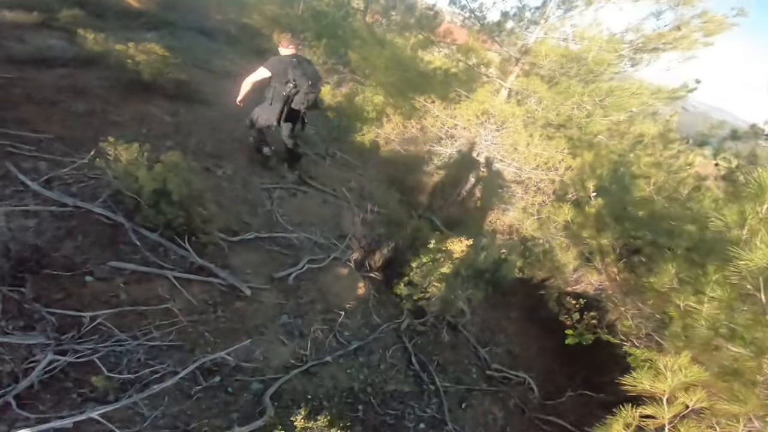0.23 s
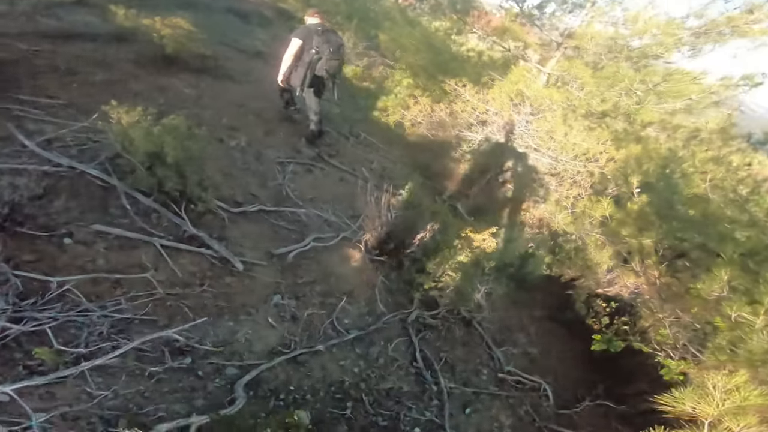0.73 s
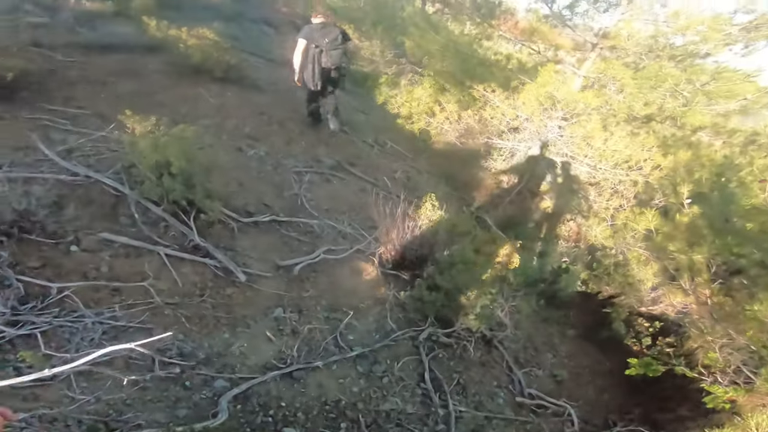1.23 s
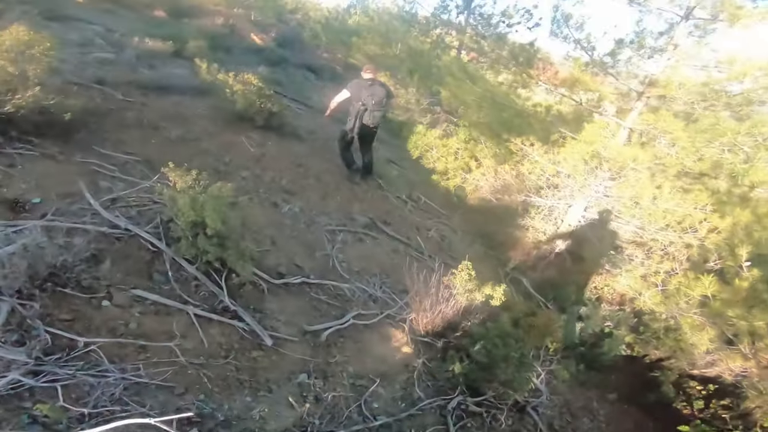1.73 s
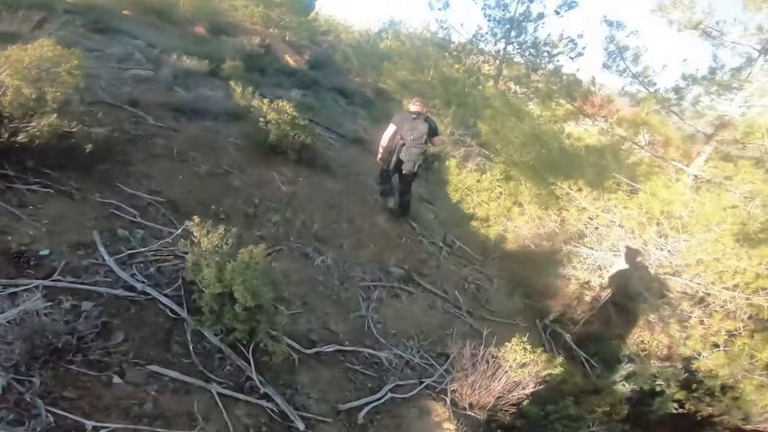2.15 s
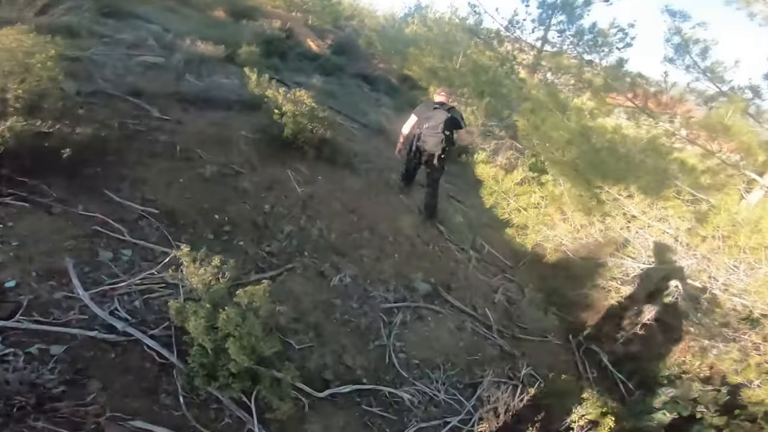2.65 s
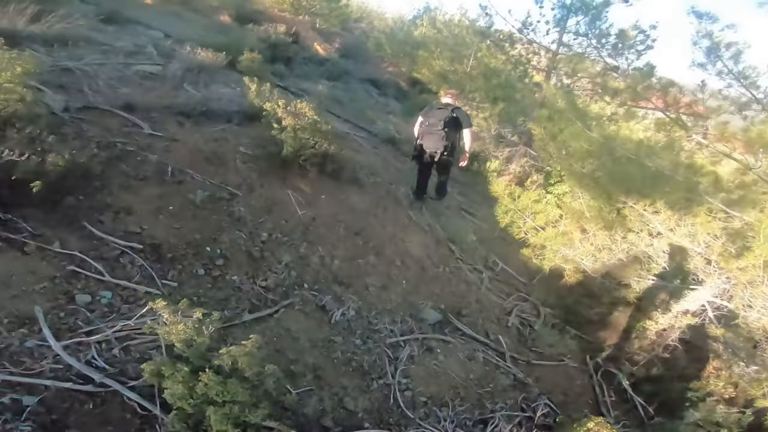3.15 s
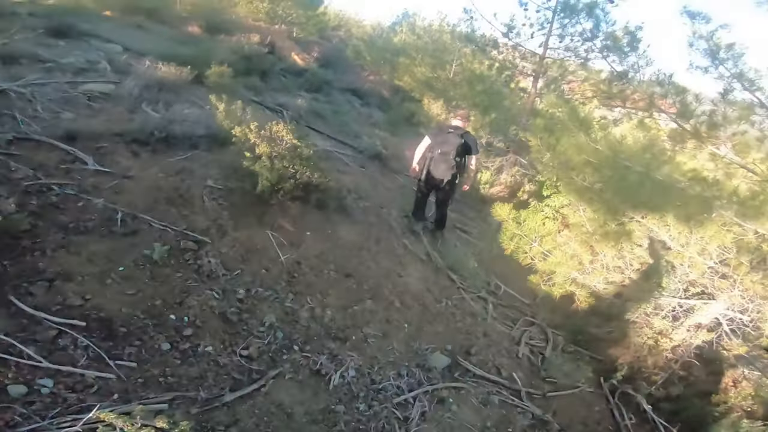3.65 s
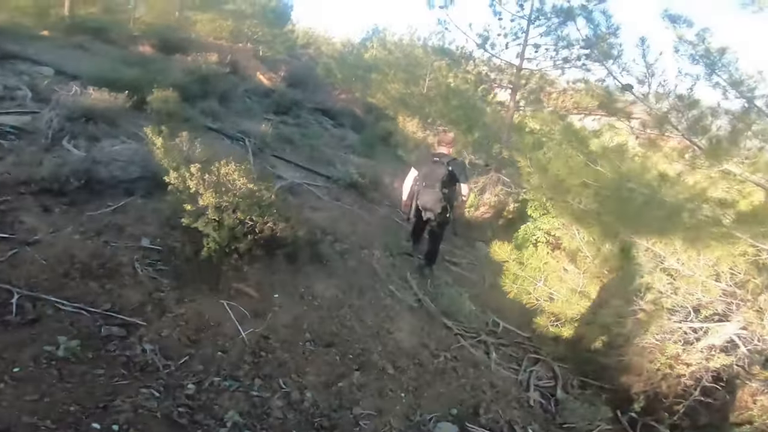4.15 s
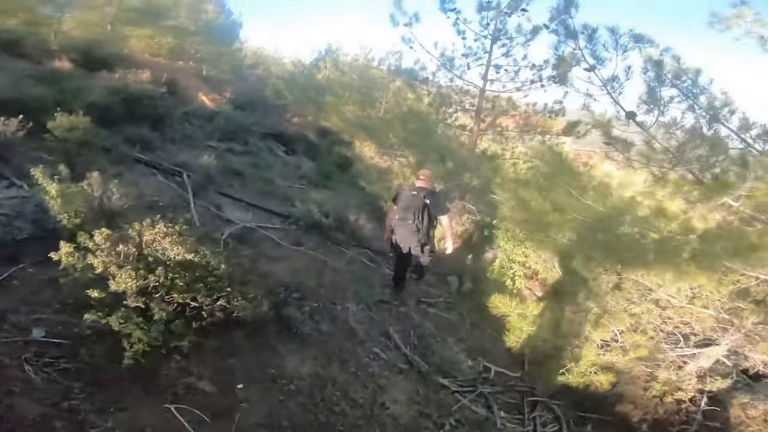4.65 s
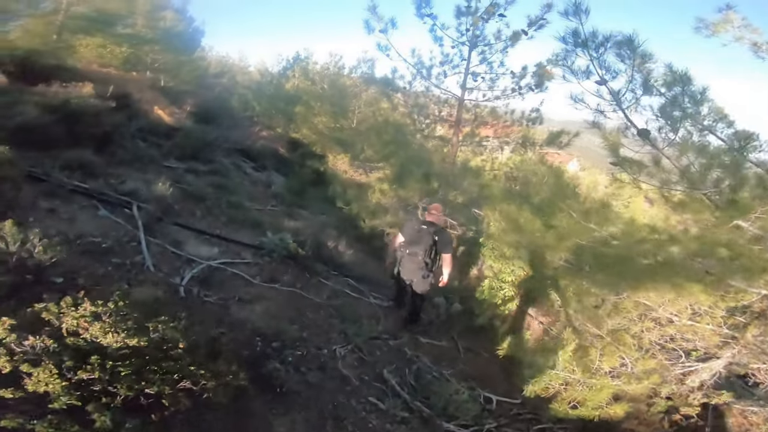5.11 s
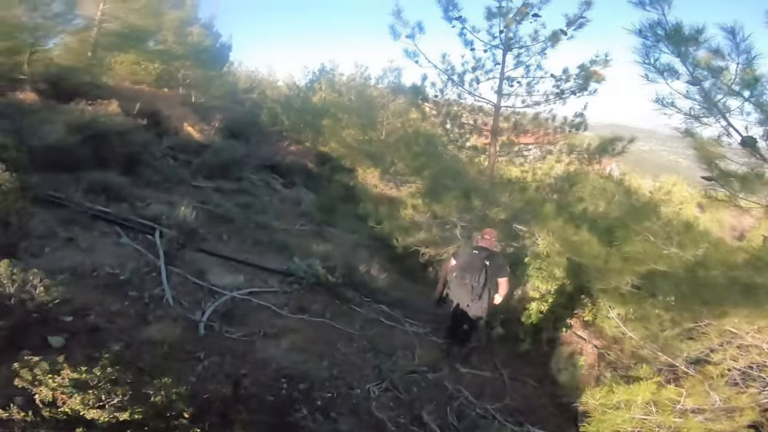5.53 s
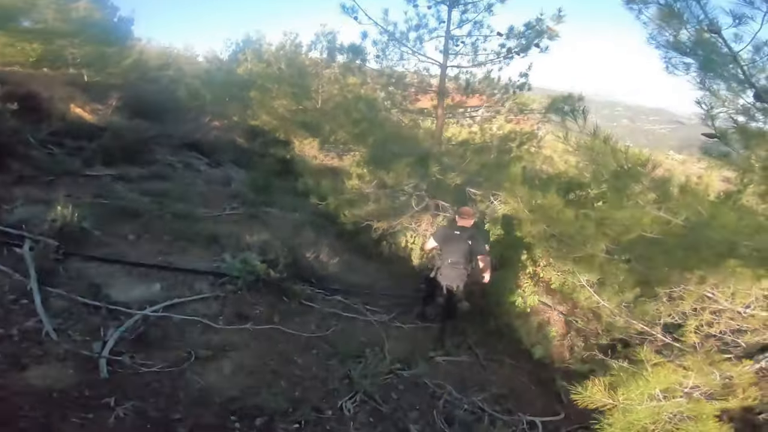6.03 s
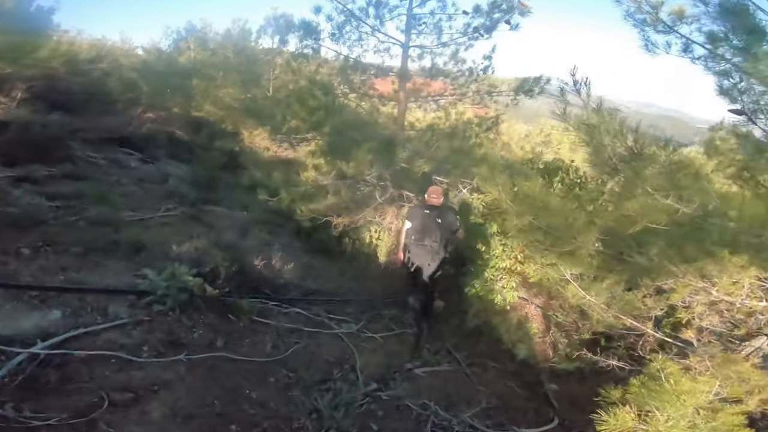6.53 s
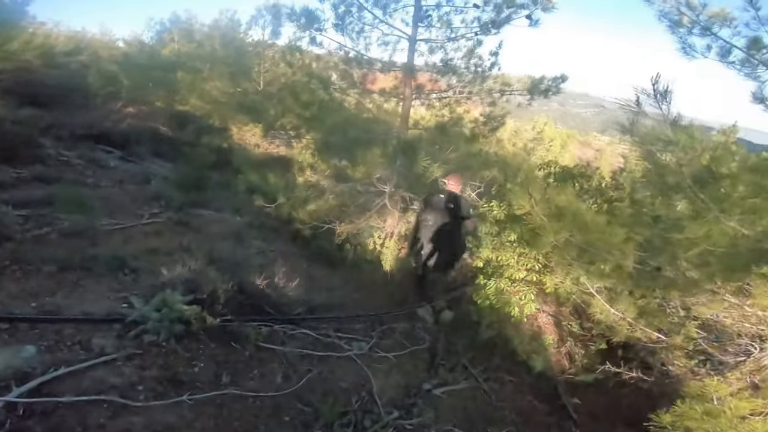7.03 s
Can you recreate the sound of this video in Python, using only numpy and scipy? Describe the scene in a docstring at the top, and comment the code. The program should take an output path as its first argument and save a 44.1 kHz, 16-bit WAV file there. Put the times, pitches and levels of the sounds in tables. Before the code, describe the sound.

Dry twigs crack under uneven footsteps as hikers push through rustling scrub, a light wind in the pines.

```python
"""Scrub rustles and scrapes along clothing, mostly on the right, as hikers cross a slope of pine litter.
Wind hushes in the pines and now and then buffets a body-worn microphone. Boots grind and thud,
dead twigs snap, loose sticks knock, and a branch rasps once. Friction is modelled as many tiny
random impacts over noise, each blow or fracture as a damped vibration, and the wind as shaped noise."""
import sys
import numpy as np
from scipy import signal
from scipy.fft import rfft, irfft, next_fast_len
from scipy.io import wavfile
from scipy.ndimage import uniform_filter1d, map_coordinates

SR = 44100
rng = np.random.default_rng(int(sys.argv[2]) if len(sys.argv) > 2 else 0)


def digitize_waveform(pressure):
    """Quantize a signal to 16-bit integers and store it at the path in sys.argv[1].

    Rows of a 2-D input are taken as channels; values are limited to [-1, 1].
    """
    field = np.atleast_2d(pressure).T
    bounded = np.clip(field, -1, 1)
    quanta = np.round(bounded * 32767).astype(np.int16)
    wavfile.write(sys.argv[1], SR, quanta)


N = 320607


def amp(db):
    """Amplitude ratio of a level in decibels."""
    return 10 ** (np.asarray(db) / 20)


def unit(x):
    """Normalisation to an rms of 1."""
    return x / np.sqrt(np.mean(x ** 2) + 1e-20)


def along(points, hz):
    """Interpolation of (frequency, value) points on a logarithmic frequency axis."""
    freqs, values = np.transpose(points)
    return np.interp(np.log(hz + 1), np.log(freqs + 1), values)


def curve(points):
    """Linear interpolation of (time, value) points at every sample."""
    return np.interp(np.arange(N) / SR, *np.transpose(points))


def wobble(rate):
    """Smooth random modulation: a spline through `rate` Gaussian values a second."""
    knots = rng.standard_normal(int(N * rate / SR) + 4)
    return map_coordinates(knots, [np.arange(N) * rate / SR])


def filtered(x, response):
    """Linear filtering: the spectrum is multiplied by a frequency response."""
    n = x.shape[-1]
    padded = next_fast_len(2 * n)
    return irfft(rfft(x, padded) * response(np.fft.rfftfreq(padded, 1 / SR)), padded)[..., :n]


def resonance(f, hz, q):
    """Response of a damped oscillator of natural frequency hz and quality factor q."""
    return 1j * f * hz / q / (hz * hz - f * f + 1j * f * hz / q)


def pan(side_db):
    """Constant-power panning by a level difference, left minus right."""
    gains = np.array([amp(side_db / 2), amp(-side_db / 2)]).reshape(2, -1)
    return gains / np.sqrt(np.mean(gains ** 2, axis=0))


# Likeness of left and right: (frequency [Hz], correlation [0-1])
COHERENCE = [(40, 0.38), (170, 0.92), (380, 0.91), (750, 0.65), (1300, 0.11), (2400, 0.63), (4400, 0.7),
             (8000, 0), (15000, 0.031)]

def stereo(pair, spectrum=((1, 0),)):
    """Partial coherence: two independent signals, shaped by a spectrum, mix as mid and side."""
    def response(hz):
        angle = np.arccos(np.clip(along(COHERENCE, hz), -1, 1)) / 2
        return amp(along(spectrum, hz)) * [np.cos(angle), np.sin(angle)]
    mid, side = filtered(pair, response)
    return unit(np.array([mid + side, mid - side]))


def add(track, s, sound):
    """Superposition of a short sound on a track at time s."""
    start = max(round(s * SR), 0)
    part = track[:, start:start + sound.shape[1]]
    part += sound[:, :part.shape[1]]


def crackle(rate, hz, cycles, spread_db, smooth_db):
    """Shot noise: tiny fractures ring, falling to 1/e in `cycles` periods, over smooth rubbing noise."""
    draws = rng.random((int(rate * N / SR), 6))
    t = np.arange(SR // 250) / SR
    pitch = hz * 2 ** (1.42 * (draws[:, 1] + draws[:, 2] - 1))[:, None]
    size = amp(-spread_db * np.log(0.15 + draws[:, 3]))[:, None]
    rings = size * np.sin(2 * np.pi * pitch * t) * np.exp(-pitch * t / cycles)
    samples = ((draws[:, :1] * N).astype(int) + np.arange(len(t))).ravel()
    signs = np.sign(draws[:, 4:].T - .5)
    pair = np.array([np.bincount(samples, (rings * sign[:, None]).ravel(), N)[:N] for sign in signs])
    return unit(pair) + amp(smooth_db) * rng.standard_normal((2, N))


def patchy(pair, depth_db):
    """Spectral modulation: brief resonances come and go as different stalks and stones are touched."""
    spectra = signal.stft(pair, nperseg=512)[2]
    field = rng.standard_normal(spectra.shape[1:])
    for axis in (0, 1):
        field = uniform_filter1d(field, size=4, axis=axis)
    return unit(signal.istft(spectra * amp(depth_db * unit(field)), nperseg=512)[1][:, :N])


def stroke(s, length, attack_s, release_s, arch_db):
    """Contact envelope: exponential rise and decay (seconds per 20 dB) around an arched or dipped hold."""
    t = np.arange(N) / SR - s
    middle = np.sin(np.pi * np.clip(t / length, 0, 1))
    rise_db = -20 * np.maximum(-t / attack_s, 0)
    decay_db = -20 * np.maximum((t - length) / release_s, 0)
    return amp(arch_db * middle + rise_db + decay_db)


def contacts(rows, **envelope):
    """Incoherent addition: contacts sum in power, giving gains for the main sound and its bright part."""
    gains = np.array([amp(db) * stroke(s, length, **envelope) for s, length, db, _ in rows])
    bright = amp([row[3] for row in rows])[:, None]
    return np.linalg.norm(gains, axis=0), np.linalg.norm(gains * bright, axis=0)


def stalks(per_s=45, decay_s=.002, spread_db=6):
    """A Poisson process: tiny dry stalks break at random, each in a decaying burst of coloured noise."""
    breaks = (rng.random(N) < per_s / SR) * amp(spread_db * rng.uniform(-0.93, 1, N))
    bursts = signal.lfilter([1], [1, -np.exp(-1 / (decay_s * SR))], breaks)
    return unit(bursts * patchy(rng.standard_normal((2, N)), depth_db=5))


# Sprigs dragged over clothing: (time [s], duration [s], level [dB], fabric relative to needles [dB])
BRUSHES = [(.04, 0.059, -49, -8.5), (.19, .12, -48.5, -13), (.645, 0.25, -48, -6.5),
           (1.14, 0.16, -47, -7.5), (1.29, 0.17, -50, -3), (1.59, 0.27, -47, -8.5), (1.9, 0.25, -50, -6.5),
           (2.195, 0.022, -43.5, -5.5), (2.29, 0.2, -50, -8), (2.5, 0.046, -41.5, -10),
           (3.238, 0.08, -39.5, -7), (3.33, 0.24, -46.5, -8), (4.24, 0.092, -46, -5),
           (4.36, 0.25, -46.5, -8), (4.585, 0.13, -42.5, -1), (4.915, 0.088, -42.5, -8),
           (5.02, 0.067, -44, -12), (5.235, 0.0053, -40, -9), (5.6, 0.13, -52, -4), (5.77, 0.16, -51.5, -2),
           (5.95, 0.063, -32, -13.5), (6.04, 0.15, -50.5, -5.5), (6.335, 0.23, -53.5, 3),
           (6.595, 0.19, -44, 0), (6.82, 0.16, -47, -4.5), (7.05, 0.16, -46.5, -2.5)]
# Steady rustle of walking, hushed where the walker slows: (time [s], level [dB])
RUSTLE = [(0, -54.5), (1.0, -54.5), (1.5, -52), (2.6, -53.5), (3.07, -56.5), (3.2, -66), (3.6, -54.5),
          (4.0, -57.5), (4.8, -52), (5.2, -53), (5.8, -50.5), (6.25, -54.5), (7.27, -49)]
# Direction of the needles and the grit: (time [s], left minus right [dB])
CONTACT_SIDE = [(0, 3), (.8, -8), (1.3, 1), (2.2, -4.5), (2.5, -8.5), (2.9, -4.5), (3.3, -7.5), (3.8, -5.5),
                (4.4, -10), (4.7, -11), (5, -5), (6.7, -12.5)]
# Friction spectra of needles and of fabric: (frequency [Hz], level [dB])
NEEDLE_SPECTRUM = [(200, -40), (900, -2), (1600, -0.5), (2400, -2.5), (3300, -1), (4400, -3.5),
                   (5400, -2.5), (7000, -18.5), (10000, -23), (16000, -47)]
FABRIC_SPECTRUM = [(1500, -53), (4500, -27.5), (6500, -0.5), (7700, 0.5), (8700, -1.5), (9700, -8),
                   (11000, -20), (15000, -25.5)]

def scrub(stirred_db=-11, rustle_sheen_db=-6, stalks_db=-8):
    """Stick-slip friction: needles catch and let go in ticks, stalks break, and tips hiss over fabric."""
    brush, sheen = contacts(BRUSHES, attack_s=0.017, release_s=0.048, arch_db=-1)
    _, grind = contacts(STEPS, **STEP_ENVELOPE)  # the soles stir needles too
    rustle = amp(curve(RUSTLE))
    brush = np.linalg.norm([brush, rustle, amp(stirred_db) * grind], axis=0)
    sheen = np.hypot(sheen, amp(rustle_sheen_db) * rustle)
    side_db = curve(CONTACT_SIDE)
    drag = amp(1.1 * wobble(120))
    ticks = patchy(crackle(rate=650, hz=4800, cycles=.8, spread_db=3.8, smooth_db=4.5), depth_db=2)
    crunch = ticks + amp(stalks_db) * stalks()
    needles = amp(-1.5) * brush * stereo(crunch, NEEDLE_SPECTRUM) * pan(side_db)
    fabric = amp(-2.0) * sheen * stereo(crunch, FABRIC_SPECTRUM) * pan(0.35 * side_db)
    return drag * (needles + fabric)


# Puffs of air over the microphone: (time [s], level [dB], half width at 1/e [s])
PUFFS = [(.12, -44, 0.036), (.77, -44, 0.092), (2.0, -52, 0.099), (2.66, -52, 0.094), (4.17, -41.5, 0.04),
         (4.76, -52, 0.087), (5.35, -42.5, 0.034), (5.86, -44.5, 0.16), (6.39, -39.5, 0.095),
         (6.83, -53, 0.14)]
# Spectra of wind in the pines and at the microphone: (frequency [Hz], level [dB])
HUSH_SPECTRUM = [(25, -19), (90, -45), (170, 1), (1300, 5), (3200, 5.5), (8000, -20), (11000, -41),
                 (15000, -39)]
RUMBLE_SPECTRUM = [(12, -20), (28, 3.5), (40, -7), (60, -15), (110, -33), (300, -64), (900, -110)]

def wind():
    """Turbulence: a broadband hush in the pines, and low pressure fluctuations at the microphone."""
    t = np.arange(N) / SR
    puffs = sum(amp(db) * np.exp(-((t - s) / width) ** 2) for s, db, width in PUFFS)
    hush = amp(-60.5 + 0.23 * wobble(2.4)) * stereo(rng.standard_normal((2, N)), HUSH_SPECTRUM)
    rumble = amp(0.5) * puffs * stereo(rng.standard_normal((2, N)), RUMBLE_SPECTRUM)
    return hush * pan(-1.0) + rumble * pan(-8.5)


# Soles pressing on the slope: (time [s], duration [s], level [dB], grit relative to scuff [dB])
STEPS = [(.06, 0.081, -42.5, -2.5), (.21, 0.093, -47, 1), (.68, 0.1, -45.5, 2), (.9, 0.05, -48, -5.5),
         (1.12, 0.17, -57, 5), (1.43, .025, -42.5, -7), (1.575, 0.11, -46.5, -1), (1.845, 0.048, -47.5, 2),
         (1.98, 0.11, -56, 5), (2.28, 0.095, -50, 2), (2.47, 0.19, -54, 2), (2.7, 0.11, -58, 1),
         (3.025, .02, -52, 3), (3.132, 0.0099, -52.5, 5.5), (3.24, 0.015, -53.5, 3), (3.41, 0.17, -52.5, 2),
         (4.115, 0.093, -52, 5.5), (4.24, 0.038, -46, 7.5), (4.355, 0.028, -50.5, 3.5),
         (4.51, 0.11, -49.5, -1), (4.672, 0.057, -43, 4.5), (4.95, 0.11, -49, 0), (5.3, 0.089, -51, 2),
         (5.56, 0.28, -47.5, 1.5), (5.94, 0.062, -45, -2), (6.07, 0.45, -57.5, -2), (6.34, 0.034, -45, 3),
         (6.455, 0.02, -43.5, 2.5), (6.62, 0.26, -53.5, 2.5), (7.03, 0.04, -61.5, 12)]
STEP_ENVELOPE = dict(attack_s=0.092, release_s=0.1, arch_db=-1.5)  # the load eases between heel and toe
# Friction spectra of dull soil and of grit: (frequency [Hz], level [dB])
SCUFF_SPECTRUM = [(30, -8.5), (95, -23.5), (150, 0), (230, 0), (400, 0), (600, -0.5), (1200, -14.5),
                  (3000, -90)]
GRIT_SPECTRUM = [(100, -53), (350, -13), (600, -4), (950, -2), (1400, -1.5), (2400, -3.5), (6000, -20),
                 (16000, -80)]

def soles(trickle_scuff_db=-62.5, trickle_grit_db=-61):
    """Granular friction: soles scuff soil and grind grit in uneven slips; soil trickles between steps."""
    press, grind = contacts(STEPS, **STEP_ENVELOPE)
    press = np.hypot(press, amp(trickle_scuff_db))
    grind = np.hypot(grind, amp(trickle_grit_db))
    slips = wobble(90)
    soil = crackle(rate=900, hz=353, cycles=0.47, spread_db=5.5, smooth_db=7.5)
    grains = crackle(rate=600, hz=900, cycles=1.2, spread_db=3.8, smooth_db=0)
    scuff = stereo(soil, SCUFF_SPECTRUM) * press * amp(1.83 * slips)
    grit = stereo(grains, GRIT_SPECTRUM) * grind * amp(2.0 * slips)
    return scuff * pan(-0.33) + grit * pan(curve(CONTACT_SIDE))


# Boots landing: (time [s], level [dB], frequency [Hz])
HEELS = [(.089, -29, 400), (.101, -30, 180), (0.126, -30.5, 160), (.698, -34, 620), (.891, -43, 640),
         (1.445, -34, 680), (1.502, -37, 420), (1.855, -38, 870), (2.273, -40, 330), (2.287, -36, 750),
         (2.363, -40, 750), (2.398, -36.5, 880), (2.906, -42, 400), (3.622, -42, 500), (2.821, -38.5, 216),
         (2.999, -38.5, 695), (3.007, -35.5, 266), (3.541, -32.5, 303), (4.899, -42, 248), (5.06, -33, 282),
         (5.32, -39.5, 1050), (5.984, -32, 327)]

def heels(grit_db=-4, grit_t60=0.07, low_cut_hz=129, gain_db=1):
    """Heavily damped impact: packed soil gives for a few cycles under a boot, with a gritty slap."""
    out, t = np.zeros((2, N)), np.arange(SR // 10) / SR
    for s, db, hz in HEELS:
        soil = 1.15 * np.sin(2 * np.pi * hz * t) * np.exp(-hz * t)
        noise = rng.standard_normal(len(t))
        grit = unit(filtered(noise, lambda f: resonance(f, hz, 2.05) * resonance(f, hz, 0.34)))
        slap = grit * amp(grit_db - 60 * t / grit_t60) * (1 - np.exp(-t / 0.00015))
        # a low cut keeps deep bass out of the thud
        thud = filtered(soil + slap, lambda f: 1j * f / low_cut_hz * resonance(f, low_cut_hz, 0.99))
        add(out, s, amp(db + gain_db) * pan(-1.4) * thud)
    return out


# Twigs breaking, and a few hollow knocks of grit under the boots: (time [s], level [dB], frequency [Hz], 60 dB
# decay time [s], left minus right [dB])
TWIGS = [ (0.3529, -30.5, 1000, 0.005, -7), (0.3754, -33, 1400, 0.011, -5), (0.429, -39, 3100, .02, 0),
         (0.9985, -31, 2350, 0.005, -10), (0.554, -37.5, 720, 0.011, 7), (0.7905, -32.5, 2400, 0.01, 0),
         (0.839, -35.5, 4100, 0.027, -12), (0.952, -37, 750, 0.0079, 6), (1.2795, -35, 3200, .014, 1),
         (1.383, -37, 3200, .012, 0), (1.4287, -33.5, 1900, 0.02, -1), (1.7343, -32, 3280, 0.016, -1),
         (1.744, -33, 3300, .014, -1), (2.062, -34, 3600, .012, 1), (2.0667, -30, 3260, 0.018, 2),
         (2.161, -37.5, 4270, 0.014, 7), (2.4755, -30.5, 850, 0.016, -4), (2.5157, -32.5, 2090, 0.022, -11),
         (2.5596, -10, 7600, 0.01, -13), (2.5602, -20.5, 5200, .008, -14), (2.561, -29, 1000, .012, -10),
         (2.532, -27, 7200, 0.022, -18), (2.64, -31, 990, 0.012, -12), (2.711, -39, 4550, 0.022, -8),
         (2.82, -40, 3750, 0.022, -8), (3.2275, -28.5, 2300, .03, -12), (3.2475, -23.5, 2400, .03, -14),
         (3.2646, -26.5, 2100, .028, -13), (3.281, -30.5, 1900, .03, -13), (3.3055, -32, 4190, .022, -10),
         (3.374, -31.5, 1970, 0.014, -12), (3.868, -38.5, 800, 0.018, 3), (3.9448, -39.5, 1100, 0.01, -8),
         (4.384, -32, 4400, 0.02, -4), (4.452, -34, 4200, 0.032, -2), (4.5145, -29.5, 2520, 0.02, -2),
         (4.5388, -29.5, 3000, 0.012, -1), (4.672, -26, 3400, 0.02, -12), (4.679, -27, 750, .009, -8),
         (4.721, -29.5, 1100, .008, -8), (4.7699, -22, 880, 0.002, -12), (4.9249, -33.5, 4800, 0.02, -2),
         (5.3578, -33.5, 4020, 0.013, -3), (5.4788, -34.5, 1770, 0.016, 1), (5.6043, -25.5, 3800, 0.02, -4),
         (5.835, -34, 4200, 0.021, -2), (5.921, -33, 3300, 0.04, -4.5), (5.953, -19, 3600, .026, -4),
         (5.9838, -26, 2800, .02, -3), (5.9935, -22.5, 4600, .025, -5), (6.0137, -23.5, 3830, .012, -4),
         (6.024, -30, 3000, .024, -4), (6.054, -35, 3800, 0.022, 0), (6.603, -34.5, 4070, 0.03, -3),
         (6.7071, -31, 5500, 0.016, -6), (6.767, -32, 3400, .016, -9), (6.791, -28, 3080, 0.017, -11),
         (6.9035, -35.5, 5200, .012, -8), (6.9271, -31, 6330, 0.0065, -8), (6.9789, -29, 3080, 0.009, -6),
         (7.2108, -34, 3800, 0.009, -6)]
# Response of the microphone to sharp sounds: (frequency [Hz], gain [dB])
CRACK_RESPONSE = [(60, -20), (160, 5.5), (7800, 4), (9500, -2.5), (11000, -10.5), (16000, -30)]

def twigs(q=2, body_db=-15, splinter_db=-3, stub_db=-20, litter_db=-24, litter_t60=0.12):
    """Fracture: a brittle twig cracks once; a tough one splinters, its stub rings and litter stirs."""
    out, t = np.zeros((2, N)), np.arange(SR // 10) / SR
    impulse = signal.unit_impulse(len(t), 20)
    for s, db, hz, t60, side_db in TWIGS:
        toughness = t60 / 0.024
        # the bend builds over a cycle or two; thick, low-pitched twigs give little treble
        bend = filtered(impulse, lambda f: resonance(f, hz, q) * resonance(f, hz, 0.88))
        body = filtered(impulse, lambda f: resonance(f, hz, 1.0) / (1 + 1j * f / hz))
        crack = bend + amp(body_db) * body
        crack /= np.sqrt(np.sum(crack ** 2) / (SR * 0.00064))  # the energy of 0.64 ms at rms 1
        noise = stereo(rng.standard_normal((2, len(t))))
        fibres = unit(filtered(noise, lambda f: resonance(f, hz, 0.82)))
        fibres *= amp(splinter_db - 60 * t / t60) + amp(litter_db - 60 * t / litter_t60)
        stub = np.sin(2 * np.pi * hz * t) * amp(stub_db - 60 * t / t60) * toughness ** 3
        fibre_share = min(toughness, 1)
        snap = (1 - fibre_share) * crack + fibre_share * fibres + stub
        snap = filtered(snap, lambda f: amp(along(CRACK_RESPONSE, f)))
        add(out, s, amp(db) * pan(side_db) * snap)
    return out


# Sticks knocking: (time [s], level [dB], frequency [Hz], 60 dB decay time [s], left minus right [dB])
STICKS = [(1.169, -33, 5100, .02, -4), (1.678, -28, 3350, .035, -1), (2.0662, -24.5, 3250, .02, 1),
          (4.374, -30, 5400, .018, -4), (5.153, -35.5, 1630, .036, -3), (6.6885, -29, 3200, .018, -8),
          (6.726, -35, 1640, .02, -3), (6.861, -33, 2900, .02, -7), (7.0295, -30, 1700, .014, -4)]

def sticks(overtone_ratio=1.67, overtone_db=-5, tick_db=-6, tick_t60=0.014, rattle_rad=0.465):
    """Free vibration: a kicked stick ticks, then rings in two modes whose phase the rattling roughens."""
    out, t = np.zeros((2, N)), np.arange(SR // 10) / SR
    for s, db, hz, t60, side_db in STICKS:
        ring = np.zeros(len(t))
        for ratio, mode_db in ((1, 0), (overtone_ratio, overtone_db)):
            phase = 2 * np.pi * hz * ratio * t + rattle_rad * wobble(hz / 4)[:len(t)]
            ring += amp(mode_db - 60 * t * ratio / t60) * np.sin(phase)
        ring = filtered(ring, lambda f: amp(along(CRACK_RESPONSE, f)))
        noise = stereo(rng.standard_normal((2, len(t))), NEEDLE_SPECTRUM)
        tick = amp(tick_db - 60 * t / tick_t60) * noise
        add(out, s, amp(db) * pan(side_db) * (ring / 2 + tick))
    return out


# Normal modes of a branch: (frequency [Hz], quality factor [-], level [dB])
BRANCH_MODES = [(3120, 25, -1), (3650, 9, -1), (5160, 12, -6)]

def branch(level_db=-50.5):
    """Forced vibration: bark catches in quick ticks that drive the modes of the branch."""
    drag = amp(level_db) * stroke(s=1.61, length=0.16, attack_s=.025, release_s=.035, arch_db=7.5)
    ticks = stereo(crackle(rate=170, hz=3500, cycles=1, spread_db=4, smooth_db=-10))
    wood = lambda f: sum(amp(db) * resonance(f, hz, q) for hz, q, db in BRANCH_MODES)
    return drag * unit(filtered(ticks, wood))


def scene():
    """Superposition: the sound pressures of all sources around the walker add."""
    return twigs() + sticks() + heels() + soles() + scrub() + branch() + wind()


def record(dry):
    """Saturation and band limiting: the highest peaks are rounded and the top treble is cut off."""
    ceiling, band_limit_hz = .95, 15850
    rounded = dry / (1 + (dry / ceiling) ** 8) ** (1 / 8)
    return filtered(rounded, lambda hz: hz < band_limit_hz)


dry = scene()
out = record(dry)
digitize_waveform(out)
```